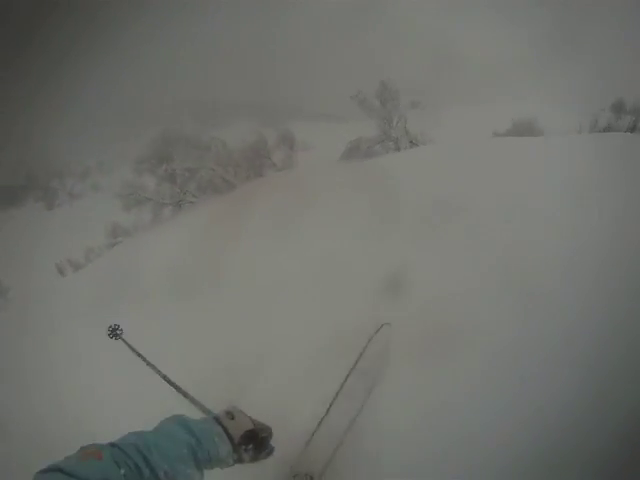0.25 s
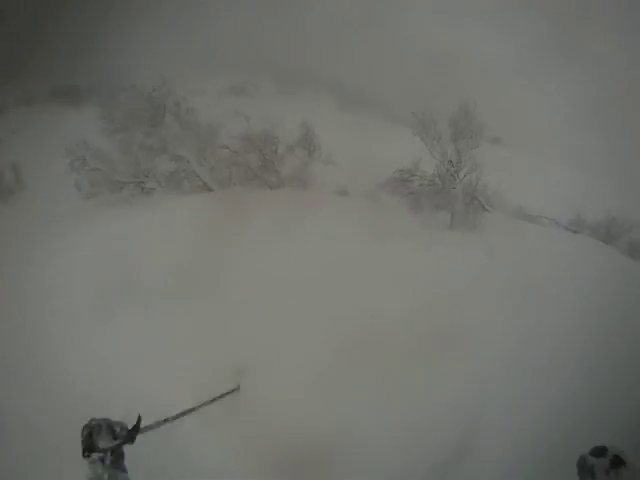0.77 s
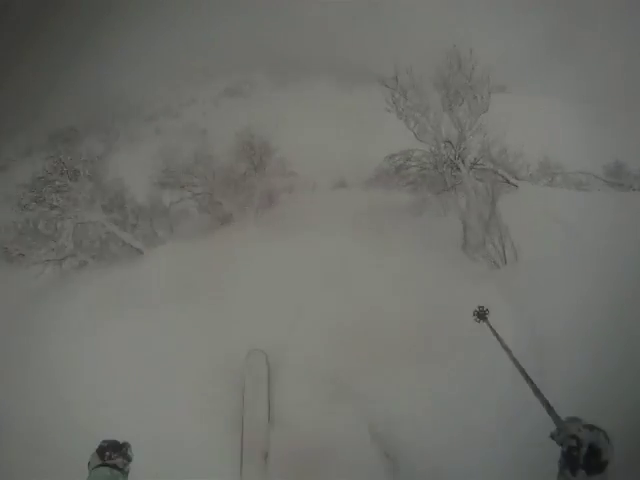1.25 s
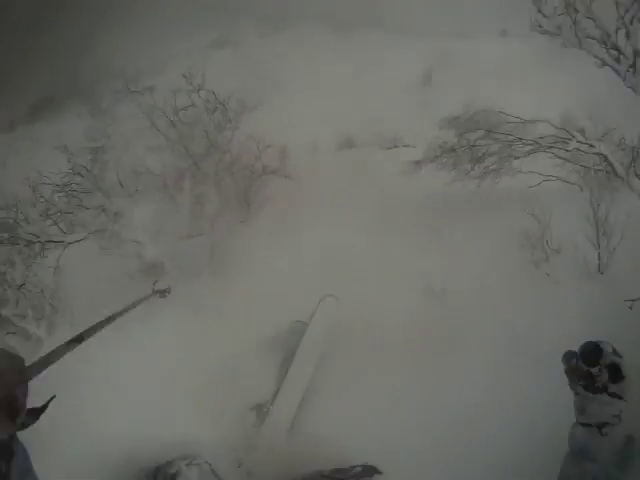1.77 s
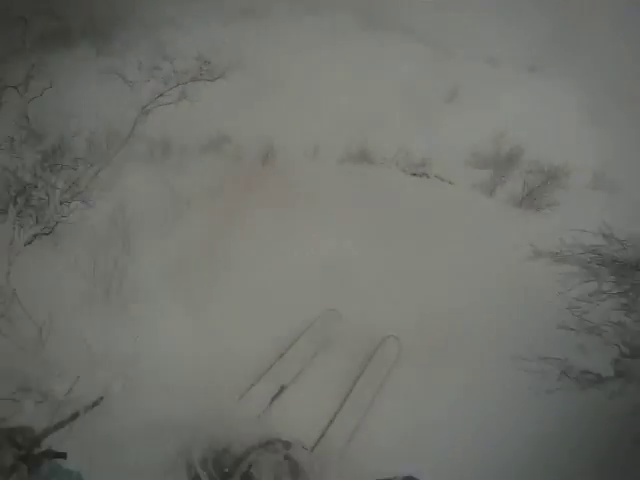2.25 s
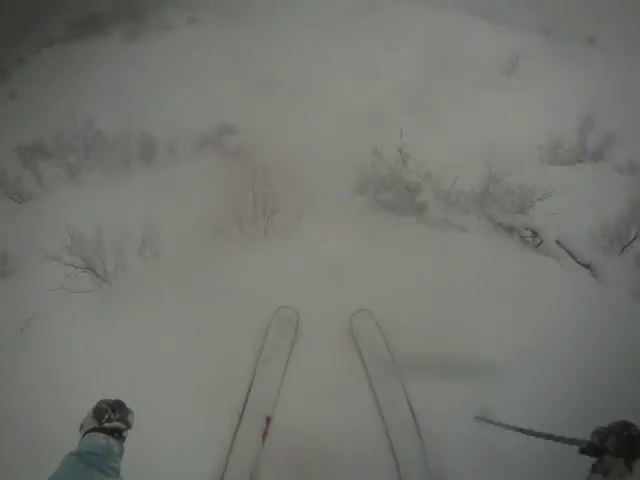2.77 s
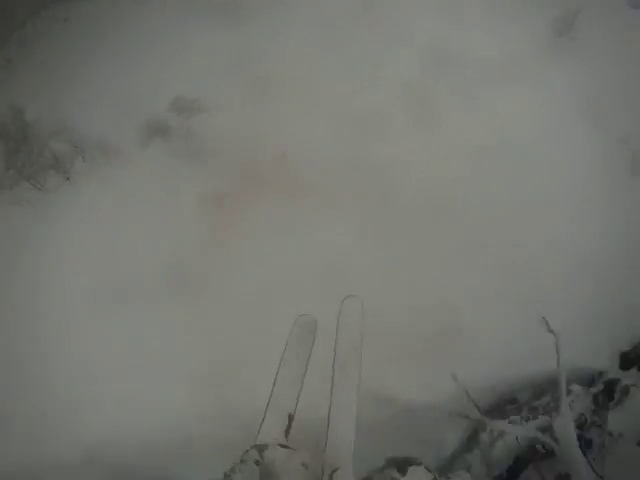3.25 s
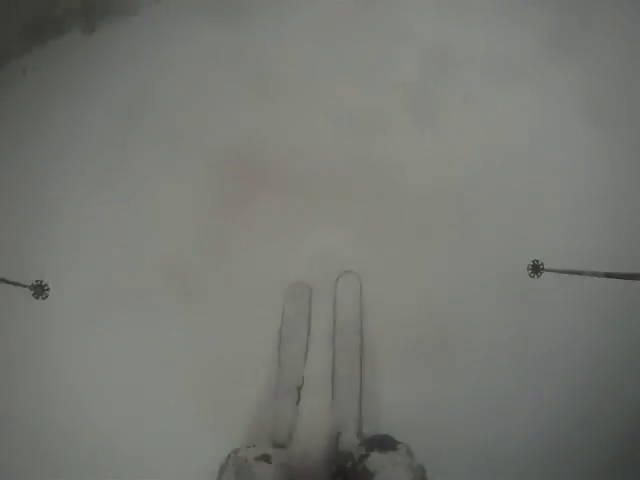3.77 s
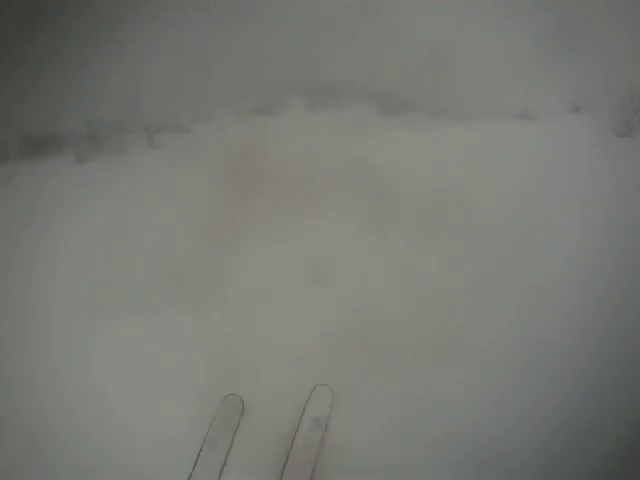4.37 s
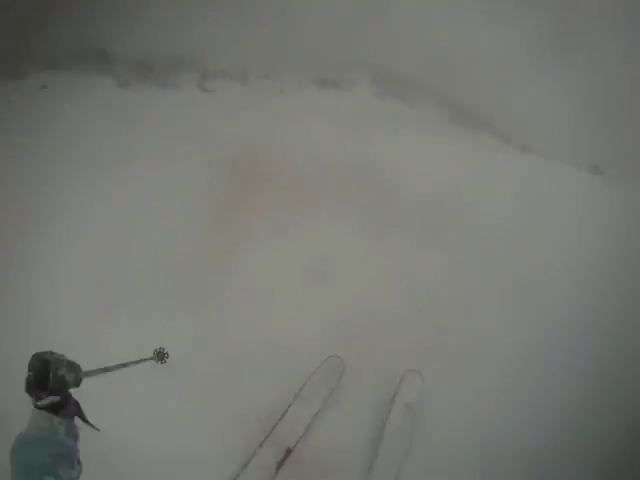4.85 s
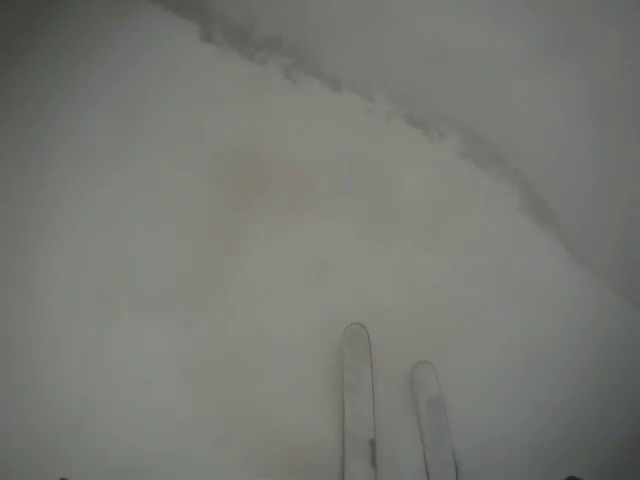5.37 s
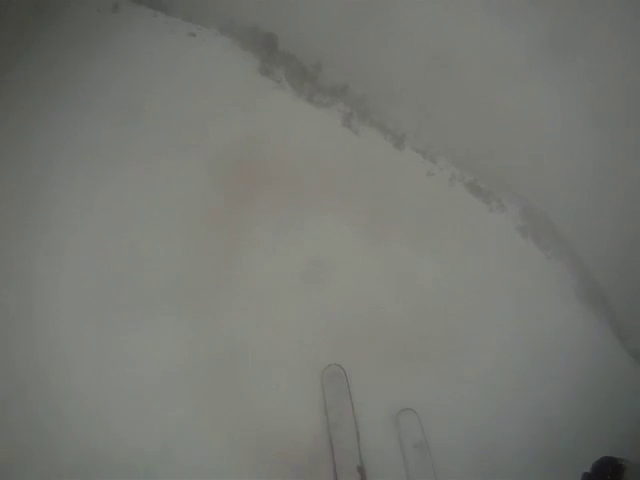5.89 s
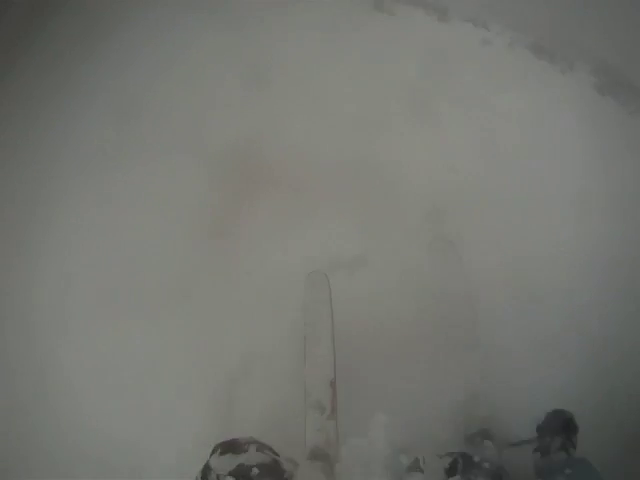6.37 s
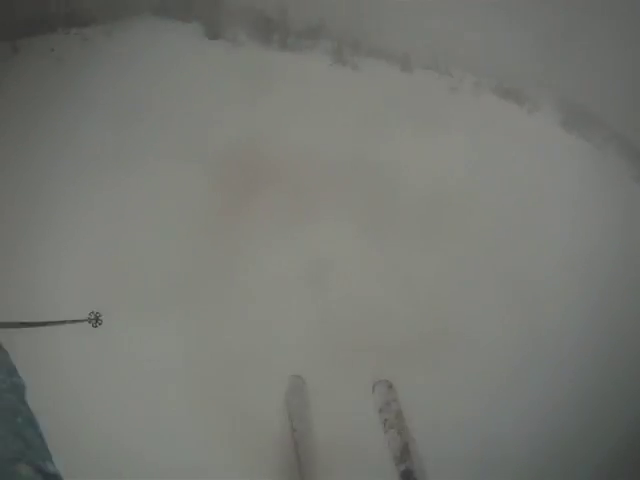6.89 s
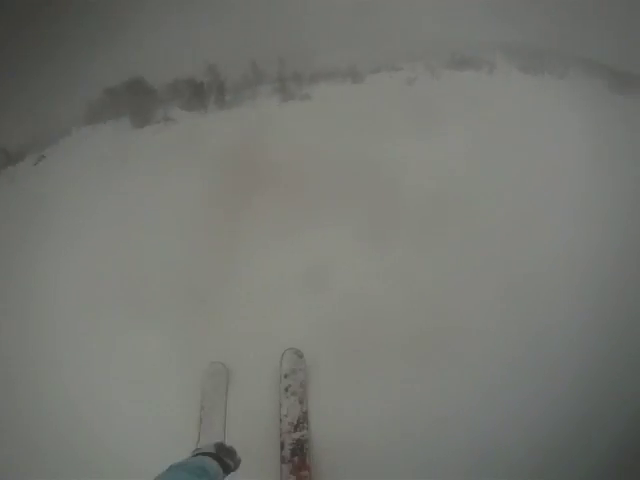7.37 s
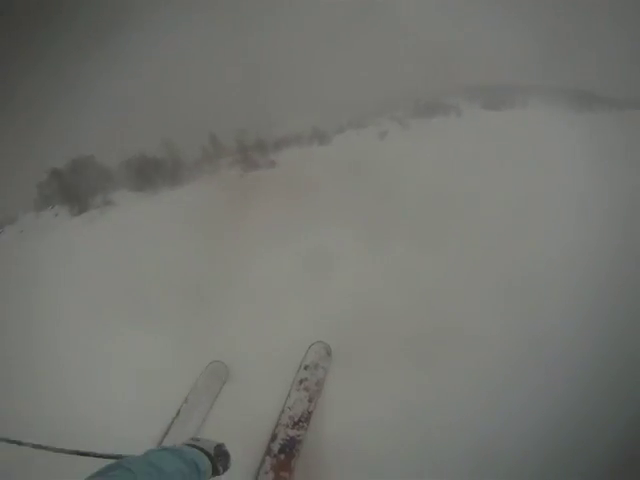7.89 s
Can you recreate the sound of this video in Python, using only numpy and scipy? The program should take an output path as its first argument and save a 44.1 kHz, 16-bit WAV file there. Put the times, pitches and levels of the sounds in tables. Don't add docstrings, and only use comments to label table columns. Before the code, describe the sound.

A skier rushes through powder: sparse plastic ticks at first, then dense crackling snow spray, low wind rumble and jolting thuds heard close.

```python
import sys
import numpy as np
from scipy import signal
from scipy.fft import rfft, irfft
from scipy.io import wavfile
from scipy.ndimage import uniform_filter1d

SR = 44100
rng = np.random.default_rng(int(sys.argv[2]) if len(sys.argv) > 2 else 0)


def boost(x):
    u = np.asarray(x, float) / 20
    return 10 ** u


def dump(signal):
    limited = np.clip(np.atleast_2d(signal).T, -1, 1)
    pcm = np.round(limited * 32767).astype(np.int16)
    wavfile.write(sys.argv[1], SR, pcm)


N = 358533
CAM_RATE, HOLD, SKIP_EVERY = 12000, 4, 31
M = round(N / SR * CAM_RATE) + 700

# start/s, end/s
CATCH_UP_S = (5.82, 6.98)


def camera_time(s):
    start, end = CATCH_UP_S
    return s + np.clip(np.asarray(s) - start, 0, end - start) / SKIP_EVERY


def in_time(rows):
    s, *columns = np.transpose(rows)
    return [np.interp(np.arange(M) / CAM_RATE, camera_time(s), c) for c in columns]


def rms_one(x):
    return x / np.sqrt(np.mean(x ** 2) + 1e-20)


def evened(x, span_s):
    power = uniform_filter1d(x ** 2, round(span_s * CAM_RATE))
    return rms_one(x / np.sqrt(power + 1e-12))


def drift(rate_hz):
    r = np.exp(-2 * np.pi * rate_hz / CAM_RATE)
    noise = rng.standard_normal(M + 6000)
    return rms_one(signal.lfilter([1], [1, -2 * r, r * r], noise)[6000:])


def ring(clicks, hz, width_hz):
    r = np.exp(-np.pi * width_hz / CAM_RATE)
    w = 2 * np.pi * hz / CAM_RATE
    return signal.lfilter([0, np.sin(w)], [1, -2 * r * np.cos(w), r * r], clicks + 1e-18)


def band(x, low_hz, high_hz):
    return signal.sosfilt(signal.butter(2, [low_hz, high_hz], "band", fs=CAM_RATE, output="sos"), x)


def below(x, edge_hz):
    return irfft(rfft(x) * (np.fft.rfftfreq(N, 1 / SR) < edge_hz), N)


def coloured(spectrum, flutter_db, rate_hz):
    hz, level_db = np.transpose(spectrum)
    grid_hz = np.fft.rfftfreq(M, 1 / CAM_RATE) + 1
    weight = boost(np.interp(np.log(grid_hz), np.log(hz), level_db))
    shaped = irfft(rfft(rng.standard_normal(M)) * weight, M)
    return rms_one(shaped * boost(flutter_db * drift(rate_hz)))


def shatter(shape, spread_s):
    t = np.arange(shape[-1]) / CAM_RATE / spread_s
    burst = rng.standard_normal(shape) * t * np.exp(-t)
    return burst / np.sqrt(np.sum(burst ** 2, axis=-1, keepdims=True))


def swells(steady_db, events, rise):
    t = np.arange(M) / CAM_RATE
    lifts = []
    for s, peak_db, fade_s in events:
        late = t - camera_time(s)
        lifts.append(peak_db - 20 * np.maximum(late / fade_s, -late / (rise * fade_s)))
    return np.maximum(steady_db, np.max(lifts, axis=0))


# t/s, peak/dB, 20 dB fade/s
BUMPS = [(.2, -42.5, 1), (.93, -37.5, 0.28), (1.22, -35.5, 0.19), (1.58, -40.5, -0.32), (1.65, -34, 0.0849),
         (2.22, -39, 0.26), (2.455, -25, 0.11), (3.3, -32, 0.9), (3.825, -16, 0.0734), (3.975, -23.5, 0.54),
         (4.12, -26, -0.45), (4.01, -30.5, 0.25), (4.189, -17.5, 0.0769), (4.62, -27, 0.36),
         (5.03, -33, 1.04), (5.27, -33, 0.33), (5.43, -32, 0.5), (6.3, -26.5, 0.5), (6.6, -22.5, 0.49),
         (6.88, -28, 0.19)]


def shaking(tremble_db):
    return swells(tremble_db, BUMPS, rise=0.458)


# t/s, buffeting/dB, mount hum/dB, air rush/dB
AIRFLOW = [(0.0, -40.5, -47, -54.5), (0.7, -39.5, -54.5, -65), (1.1, -36.5, -40.5, -63),
           (1.5, -46.5, -54.5, -67), (2.1, -39, -40, -55.5), (2.5, -22.5, -40.5, -53),
           (2.9, -30.5, -43, -55), (3.5, -24.5, -39, -47), (3.9, -32.5, -37.5, -44), (4.4, -24, -35, -41.5),
           (4.7, -30.5, -37, -40), (5.2, -39, -34.5, -41.5), (5.5, -31, -44.5, -52),
           (5.9, -28.5, -38, -39.5), (6.3, -24.5, -30.5, -43.5), (7.0, -25, -32.5, -39),
           (7.8, -34.5, -38.5, -39.5), (8.13, -33.5, -40.5, -39.5)]
# t/s, peak/dB, 20 dB fade/s
GUSTS = [(1.26, -30, 1), (1.62, -28, -0.13), (2.0, -25, 0.72), (2.421, -20, -0.49), (3.24, -21, 0.52),
         (3.8, -18.5, -0.7), (3.97, -7, -0.2762), (4.19, -21, 1.21), (5.0, -29.5, 0.75), (5.21, -26.5, 0.7),
         (5.37, -26, 1.32), (6.32, -21.5, 1.5), (6.48, -10, -0.15), (6.6, -15.5, 0), (6.79, -25, -3)]


def wind(lumps_db):
    flow_db, tremble_db, _ = in_time(AIRFLOW)
    buffet_db = swells(flow_db, GUSTS, rise=0.713) - 3.5
    hum_db = shaking(tremble_db) - 2.5 + 1.624 * lumps_db
    buffet = band(rng.standard_normal(M), 9.97, 23.83)
    buffet = buffet + boost(-18.0) * band(rng.standard_normal(M), 26.4, 71.5)
    hum = ring(rng.standard_normal(M), 97.13, 35.4)
    hum = hum + boost(-17.0) * ring(rng.standard_normal(M), 45.0, 38.7)
    hum = band(band(hum, 39.1, 171.7), 39.1, 171.7)
    return boost(buffet_db) * evened(buffet, span_s=0.1) + boost(hum_db) * evened(hum, span_s=0.0507)


# f/Hz, density/dB per Hz
RUSH = [(76, 3), (130, -6), (167, -4), (215, -2.5), (287, 1), (609, -5.5), (1200, -15), (2640, -52)]


def air_rush(lumps_db):
    _, tremble_db, rush_db = in_time(AIRFLOW)
    shaken_db = np.minimum(shaking(tremble_db) - tremble_db, 15)
    rush_db = rush_db + 0.266 * shaken_db - 1.0 + lumps_db
    rush = boost(rush_db + 1.0) * coloured(RUSH, flutter_db=-1.0, rate_hz=86.0)
    drone = ring(rng.standard_normal(M) * boost(0.44 * drift(6.6)), 208.3, 31.6)
    return rush + boost(rush_db - 4.5) * rms_one(drone)


# t/s, thickness/dB, coarseness/dB
SPRAY = [(0.0, -53, 5), (0.4, -53.5, 4.5), (0.8, -62.5, 1.5), (0.95, -57, 3.5), (1.63, -57.5, 3),
         (2.5, -47, 3.5), (2.94, -48.5, 0), (3.5, -38.5, -1.5), (3.67, -34, 1.5), (4.0, -37, 1.5),
         (4.26, -31.5, -3), (4.66, -33, -2), (5.25, -32, -2.5), (5.65, -34.5, -6), (5.9, -31.5, -5),
         (6.38, -33.5, 0), (6.59, -35.5, 1), (8.13, -34.5, -2)]
# f/Hz, density/dB per Hz
HISS = [(530, -8.5), (900, -7.5), (1200, -5.5), (1480, 1), (2140, -3), (2950, -10.5), (3540, -3.5),
        (4340, -15), (5080, -11), (5900, -11.5), (7670, -56), (13000, -120)]
# f/Hz, width/Hz, level/dB
CASE = [(950, 124, -19), (1405, 146, -0.5), (2063, 208, 0), (2194, 307, -1), (2770, 245, -6),
        (3553, 316, 2.5), (4080, 3060, -17.5), (5011, 865, 0.5)]


def spray(lumps_db):
    hiss_db, coarse_db = in_time(SPRAY)
    thick = boost(0.25 * (hiss_db + 35.5))
    grains_per_s = 600 * thick * boost(4.0 * drift(15))
    born = rng.random(M) < grains_per_s / CAM_RATE
    sizes = born * boost(6.71 * np.minimum(rng.exponential(1, M), 2.1)) / np.sqrt(thick)
    crumble_s, patchy = 0.00054, 1.29
    patter = 0
    for hz, width_hz, db in CASE:
        share = sizes * boost(4.25 * rng.standard_normal(M))
        envelope = signal.lfilter([1], [1, -np.exp(-1 / (CAM_RATE * crumble_s))], share)
        crumble = envelope * rng.standard_normal(M)
        level = boost(db + patchy * np.roll(lumps_db, round(hz))) * np.sqrt(width_hz)
        dulling = thick ** (-0.4 * np.log2(hz / 2100))
        patter = patter + level * dulling * ring(crumble, hz, width_hz)
    hiss_level = boost(hiss_db - 2.0 + 0.725 * np.roll(lumps_db, CAM_RATE))
    hiss = hiss_level * coloured(HISS, flutter_db=1.5, rate_hz=68)
    return boost(hiss_db + coarse_db - 1.0) * rms_one(patter) + hiss


# t/s, height, build-up/s, fall/s, gain dip afterwards/dB
SHOVES = [(3.824, -0.28, 0.0048, 0.002914, 1.5), (3.85, 0.825, 0.00151, 0.0014, 4),
          (3.164, 0.146, 0.0046, 0.0135, -1), (3.31, 0.136, 0.0045, 0.0152, 2.5),
          (3.786, -0.154, 0.0038, 0.0082, -3), (3.803, 0.1, 0.0028, .007, 2),
          (3.831, 0.114, .0025, 0.0058, -2), (3.855, -0.12, 0.0027, 0.0132, 0.5),
          (3.996, -0.077, 0.0089, 0.0046, 1), (4.018, 0.145, 0.0088, 0.0058, 0.5),
          (4.037, -.1, 0.0063, 0.0129, 1.5), (4.147, -0.083, 0.0082, 0.0037, -1.5),
          (4.193, 0.2148, 0.00204, 0.0024, 2.5), (4.252, -0.117, 0.0056, 0.0115, 0),
          (6.285, -0.11, 0.0061, 0.003, -1), (6.054, -0.095, 0.015, 0.0021, 0), (4.32, .005, .003, .003, 5),
          (1.606, 0.051, 0.0224, 0.019, 1.5), (3.935, -0.156, 0.0152, 0.0143, 0),
          (3.965, 0.22, 0.0058, 0.0033, 1.5), (5.185, -0.122, 0.0135, 0.005, -0.5),
          (5.201, 0.182, 0.0055, 0.0051, -1), (6.061, 0.12, 0.003, 0.0063, 0.5),
          (6.172, 0.15, 0.00243, 0.00254, 1), (6.304, 0.3, 0.00217, 0.00218, 4.5),
          (6.438, -0.26, 0.013, 0.0009, -0.5), (6.441, 0.36, 0.00113, 0.0055, 12),
          (6.602, -0.14, 0.0102, 0.0012, -0.5), (6.61, 0.071, 0.0034, 0.0113, 3.5),
          (6.79, -0.128, 0.0073, 0.0039, 1), (6.803, 0.2, 0.0025, 0.00183, -1.5)]


def shoves():
    t, push, dip_db = np.arange(M) / CAM_RATE, np.zeros(M), np.zeros(M)
    for s, height, rise_s, fall_s, db in SHOVES:
        late = t - camera_time(s)
        push += height * np.exp(-0.5 * (late / np.where(late < 0, rise_s, fall_s)) ** 2)
        dip_db += db * np.clip(late / 0.00224, 0, 1) * np.clip(1 - (late - 0.05) / 0.1355, 0, 1)
    return push, boost(-dip_db)


# t/s, peak/dB, ring f/Hz, crunch/dB, crunch f/Hz
KNOCKS = [(.192, -34.5, 98, -23, 440), (0.278, -39.5, 120, -26, 510), (1.559, -27.5, 98.3, -24, 1010),
          (1.659, -29, 118.2, -30, 830), (2.401, -20.5, 105, -30.5, 870), (2.497, -23.5, 108, -31, 420),
          (2.585, -29, 97.4, -40, 550), (2.971, -48.5, 110, -23.5, 960), (3.808, -36, 199, -17.5, 520),
          (4.166, -19.5, 99.5, -20.5, 770), (5.96, -46.5, 100, -7, 976), (4.317, -42, 100, -6.5, 1480),
          (4.318, -37, 216, -16.5, 502), (7.12, -44, 100, -21.5, 970), (3.828, -40, 197, -19, 354),
          (3.192, -24, 106, -36, 290), (3.044, -29.5, 104.7, -42.5, 330), (3.762, -33, 110, -10.5, 1250)]


def knocks():
    out = np.zeros(M)
    bursts = shatter((len(KNOCKS), 200), spread_s=0.00093)
    for (s, db, hz, crunch_db, crunch_hz), burst in zip(KNOCKS, bursts):
        at = round(camera_time(s) * CAM_RATE)
        click, crunch = np.zeros(M), np.zeros(M)
        click[at] = -boost(db)
        crunch[at:at + 200] = burst
        crunch = band(crunch + 1e-18, crunch_hz / 1.457, crunch_hz * 1.438)
        out += ring(click, hz, 20.8) + boost(3.0) * ring(click, 171.0, 119.6)
        out += boost(crunch_db - 8.5) * crunch / np.abs(crunch).max()
    return out


def peak_one(x):
    return x / np.abs(x).max(axis=1)[:, None]


def grains(rows, spread_s, crack_db):
    lead_s, crack_turns, crack_fades = 0.0002, 0.609, 0.289
    s, peak_db, spot_hz, loss_db = np.transpose(rows)
    at = np.round((camera_time(s) - lead_s) * CAM_RATE).astype(int)
    steps = np.arange(240)
    bursts = shatter((len(at), len(CASE), 240), spread_s)
    ticks = 0
    for k, (hz, width_hz, db) in enumerate(CASE):
        level = boost(1.32 * db - loss_db * np.abs(np.log2(hz / spot_hz)))
        ticks = ticks + level[:, None] * peak_one(ring(bursts[:, k], hz, 0.957 * width_hz))
    turns = spot_hz[:, None] * np.maximum(steps / CAM_RATE - spread_s, 0)
    crack = turns * np.exp(-turns / crack_turns) * np.cos(2 * np.pi * turns)
    crack_level = boost(crack_db - crack_fades * loss_db)[:, None]
    ticks = peak_one(ticks) + crack_level * peak_one(crack)
    ticks = boost(peak_db)[:, None] * peak_one(ticks)
    out = np.zeros(M)
    np.add.at(out, at[:, None] + steps, ticks)
    return signal.sosfilt(signal.butter(3, 720, "high", fs=CAM_RATE, output="sos"), out)


# t/s, peak/dB, spot f/Hz
BUSH_PELLETS = [(0.036, -25, 5000), (0.058, -27, 2840), (0.066, -28, 3550), (0.101, -29.0, 3550),
                (0.252, -26.5, 2840), (0.32, -27, 3550), (0.33, -26, 5000), (0.431, -28.5, 3550),
                (0.462, -34.5, 5000), (0.492, -37.5, 2100), (0.541, -28, 3550), (0.557, -39, 2100),
                (0.572, -34.5, 3550), (0.625, -33, 2840), (0.671, -34, 2840), (0.691, -37.5, 3550),
                (0.702, -36, 5000), (0.748, -38.5, 2840), (0.945, -39.5, 1400), (0.957, -47.5, 2100),
                (1.085, -33.5, 2840), (1.096, -33, 1400), (1.169, -33.5, 2100), (1.276, -33.5, 2100),
                (1.327, -36.5, 3550), (1.353, -32.5, 3550), (1.359, -32, 1400), (1.405, -41.5, 3550),
                (1.434, -35, 950), (1.458, -34.5, 5000), (1.483, -35, 2100), (1.546, -31, 2840),
                (1.552, -37, 3550), (1.564, -27, 2840), (1.568, -25, 2100), (1.678, -32.5, 3550),
                (1.606, -31, 1400), (1.693, -38, 2840), (1.782, -31, 3550), (1.807, -28, 2090),
                (1.836, -39, 3550), (1.875, -31, 5000), (1.888, -34, 1400), (1.927, -34.0, 3550),
                (1.946, -29, 3550), (1.959, -30, 3550), (2.004, -32.5, 2840), (2.038, -34.5, 2840),
                (2.102, -31.5, 2830), (2.203, -31.5, 5000), (2.296, -30, 2840), (2.387, -24, 5000),
                (2.547, -19, 3550), (2.667, -39.5, 3550), (2.702, -24.5, 3550), (2.746, -22.5, 3560),
                (2.837, -26, 2100), (2.876, -25, 1405)]
# t/s, peak/dB, spot f/Hz
CLOUD_PELLETS = [(2.943, -31, 2100), (2.952, -27.5, 2840), (2.983, -25.5, 2080), (3.049, -26.5, 1400),
                 (3.057, -20.5, 5000), (3.069, -29, 950), (3.09, -23.5, 2840), (3.097, -28, 2100),
                 (3.104, -24.5, 3550), (3.127, -28, 2840), (3.142, -31, 2840), (3.15, -34.5, 3550),
                 (3.163, -21.5, 5000), (3.21, -25.5, 2840), (3.215, -23.0, 1400), (3.221, -20.5, 2840),
                 (3.302, -33, 5000), (3.351, -32.5, 950), (3.477, -24, 1400), (3.504, -21, 2100),
                 (3.569, -23, 1400), (3.647, -19.5, 2840), (3.873, -20.5, 2840), (3.968, -24.5, 2100),
                 (4.004, -23.5, 3550), (4.017, -29, 950), (4.029, -18.5, 2080), (4.061, -20, 5000),
                 (4.147, -17, 3550), (4.16, -14.5, 2100), (4.168, -32, 2852), (4.2, -20, 2100),
                 (4.225, -22.5, 3550), (4.305, -22.5, 2840), (4.503, -21.5, 1400), (4.574, -17, 2100),
                 (4.625, -18, 3560), (4.662, -21, 1400), (4.792, -17, 950), (4.799, -19, 2100),
                 (4.911, -19, 2100), (4.915, -22, 2840), (4.962, -17, 3550), (5.037, -13.5, 2100),
                 (5.098, -17, 3550), (5.163, -14, 2850), (5.275, -11, 2840), (5.312, -11.5, 950),
                 (5.358, -19, 950), (5.478, -16.5, 3550), (5.495, -21, 950), (5.499, -15, 2100)]
# t/s, peak/dB, spot f/Hz
SLOPE_PELLETS = [(5.619, -22.5, 3550), (5.716, -11.5, 3550), (5.762, -22, 2100), (5.878, -16, 2100),
                 (5.892, -14, 1400), (5.909, -17, 3557), (5.976, -17, 3550), (5.981, -17.5, 2100),
                 (6.042, -18.5, 950), (6.084, -16, 5000), (6.149, -25, 950), (6.178, -16.5, 2110),
                 (6.184, -14.5, 5000), (6.241, -15, 3480), (6.329, -16.5, 2840), (6.384, -15, 1390),
                 (6.393, -23.5, 1400), (6.39, -15, 1400), (6.404, -25, 1400), (6.411, -15.5, 1390),
                 (6.425, -20.5, 5000), (6.433, -16, 5000), (6.5, -26.5, 3550), (6.585, -21.5, 3550),
                 (6.605, -24, 1400), (6.647, -16.5, 2853), (6.686, -12.5, 3550), (6.697, -21, 1400),
                 (6.763, -28, 5000), (6.835, -18, 1400), (6.864, -21, 950), (6.868, -29.5, 3550),
                 (7.126, -21, 3550), (7.137, -16, 1400), (7.165, -24, 1400), (7.224, -20.5, 2100),
                 (7.336, -12, 2840), (7.372, -17, 3550), (7.392, -18.5, 3550), (7.501, -19, 3550),
                 (7.567, -15, 3550), (7.602, -18.5, 2100), (7.697, -16.5, 2840), (7.702, -19, 3550),
                 (7.713, -14, 2100), (7.744, -12.5, 3550), (7.998, -21, 3550), (8.036, -21, 2840),
                 (8.085, -24, 2100)]


def medium_grains():
    pellets = BUSH_PELLETS + CLOUD_PELLETS + SLOPE_PELLETS
    rows = [(s, db - 1.5, hz, 7) for s, db, hz in pellets]
    return grains(rows, spread_s=0.0005416, crack_db=-2.0)


# t/s, peak/dB, spot f/Hz, far-tone loss/dB per octave
BUSH_GRAINS = [(.025, -30, 3480, 6), (.096, -28, 4920, 4), (.227, -32, 3490, 13), (.303, -29, 3550, 10),
               (.311, -28, 3550, 17), (.476, -40.5, 3500, 12.5), (0.129, -22.5, 2220, 7.5),
               (0.15, -21.5, 2020, -0.5), (0.192, -15.5, 1327, 3), (0.281, -14.5, 3450, 15.5),
               (0.317, -25, 3620, 19), (0.336, -23.5, 1390, 2), (0.366, -28, 2050, 1),
               (0.553, -17.5, 2080, -7), (0.602, -30.5, 3600, 3.5), (0.6969, -18, 2900, 5),
               (0.779, -32, 1430, -5.5), (1.056, -26.5, 2900, 21), (1.116, -24.5, 5010, 28),
               (1.5635, -26.5, 1554, 9.5), (1.659, -25.5, 1923, 3.5), (1.747, -29, 3470, 15),
               (2.096, -23, 2180, 24), (2.195, -24.5, 2200, 13), (2.265, -24, 3900, 0),
               (2.4, -14.5, 1460, 4.5), (2.495, -18.5, 3530, -2), (2.587, -29.5, 1380, 19),
               (2.65, -26.5, 1450, 12.5), (2.735, -23.5, 2440, 18.5), (2.868, -27.5, 1380, 9.5),
               (2.97, -26.5, 983, 15.5), (3.037, -22.5, 2000, 0), (3.193, -25, 1345, 15.5),
               (3.269, -21.5, 3547, -1), (3.317, -18.5, 1320, 38.5)]
# t/s, peak/dB, spot f/Hz, far-tone loss/dB per octave
CLOUD_GRAINS = [(3.5, -14, 1840, 7), (3.585, -18.5, 3500, 12.5), (3.717, -14.5, 1438, -1.5),
                (3.762, -10.5, 1907, 17.5), (3.815, -18.5, 1407, 20.5), (3.866, -14.5, 2300, 5),
                (4.102, -23.5, 953, 24.5), (4.119, -16, 1400, -1.5), (4.156, -6, 1400, 4.5),
                (4.182, -10.5, 1806, 11.5), (4.252, -17, 3450, 9), (4.318, -2.5, 2154, 28),
                (4.434, -14.5, 1970, 4.5), (4.489, -13.5, 1500, -3), (4.561, -10.5, 2077, 18),
                (4.655, -15, 1406, 14), (4.714, -14, 2220, 19), (4.761, -7.5, 2116, 12),
                (4.931, -10.5, 3530, 2.5), (4.981, -14, 1900, 5), (5.133, -17.5, 1240, 3),
                (5.158, -11, 2070, 7), (5.269, -5.5, 3550, 18.5), (5.319, -7.5, 1854, -1.5),
                (5.412, -14.5, 1570, 2), (5.485, -8.5, 1810, 2.5), (5.612, -15.5, 3520, 9.5),
                (5.641, -8, 2150, 9), (5.663, -14, 3100, 8), (5.708, -11.5, 1990, 4.5)]
# t/s, peak/dB, spot f/Hz, far-tone loss/dB per octave
SLOPE_GRAINS = [(5.839, -10, 2050, 23), (5.883, -9.5, 2150, 21), (5.904, -13, 2130, 7),
                (5.921, -8.5, 2236, 20), (5.961, -7, 948, 7), (6.267, -18.5, 1490, 6.5),
                (6.522, -25, 2270, 12), (6.541, -20.5, 2000, 6), (6.567, -13.5, 2230, 10.5),
                (6.598, -17.5, 2110, 8), (6.677, -18.5, 2220, 1.5), (6.719, -25.5, 1600, 4),
                (6.843, -14, 2000, 7.5), (6.901, -21.5, 2180, 15.5), (7.021, -23, 2090, 17.5),
                (7.071, -14.5, 1430, -4), (7.12, -14, 1378, 16.5), (7.232, -12.5, 2200, 3),
                (7.277, -18, 2441, 11), (7.327, -15.5, 3200, -2.5), (7.432, -20, 1330, 17),
                (7.684, -16.5, 1840, -3), (7.751, -8.5, 3245, 15.5), (7.818, -15.5, 3470, 12.5),
                (7.899, -14.5, 2340, 9.5), (7.919, -17.5, 1460, 2.5), (7.9494, -4.5, 2362, 9),
                (7.967, -17, 3450, 19)]


def large_grains():
    lumps = BUSH_GRAINS + CLOUD_GRAINS + SLOPE_GRAINS
    rows = [(s, db - 1, hz, loss_db) for s, db, hz, loss_db in lumps]
    return grains(rows, spread_s=0.0004824, crack_db=3.0)


def camera(x):
    zero, pole = 0.875, 0.7
    x = signal.lfilter([1, 2 * zero, zero ** 2], [1, 2 * pole, pole ** 2], x)
    x = x * ((1 + pole) / (1 + zero)) ** 2
    x = 0.8486 * np.tanh(x / 0.841)
    fast_rate = CAM_RATE * HOLD
    t = np.arange((M - 600) * HOLD) / fast_rate
    source = np.floor(camera_time(t) * fast_rate + 1e-6).astype(int)
    return signal.resample_poly(x[source // HOLD], 147, 160)[:N]


def scene():
    push, gain = shoves()
    lumps_db = 1.5 * drift(9.8)
    swamped = 1 / (1 + uniform_filter1d(np.abs(push), size=500) / 0.03)
    air_and_snow = swamped * wind(lumps_db) + air_rush(lumps_db) + spray(lumps_db)
    strikes = knocks() + medium_grains() + large_grains()
    return camera(gain * air_and_snow + strikes + push)[None]


def band_limit(x):
    return signal.sosfilt(signal.butter(12, 16630, fs=SR, output="sos"), x)


def record(dry):
    full, body = below(dry, edge_hz=15880), below(dry, edge_hz=15270)
    top = full - body
    power = uniform_filter1d(top ** 2, size=1500)
    stands_out = power > boost(1.5) * uniform_filter1d(power, size=12000)
    keep = uniform_filter1d(1.0 * stands_out, size=500)
    return band_limit(body + boost(-13) * keep * top)


dry = scene()
out = record(dry)
dump(out)
```